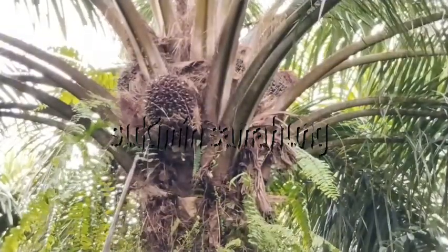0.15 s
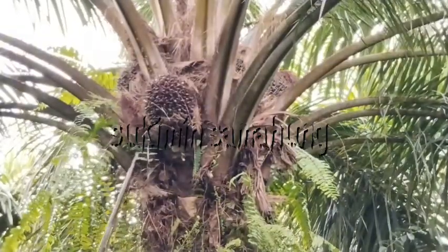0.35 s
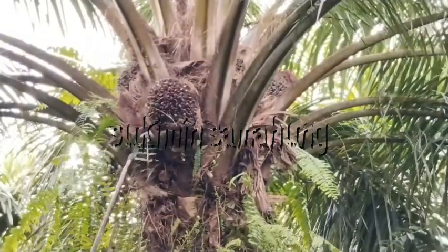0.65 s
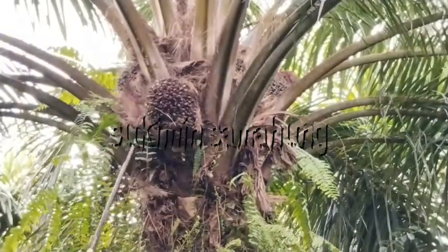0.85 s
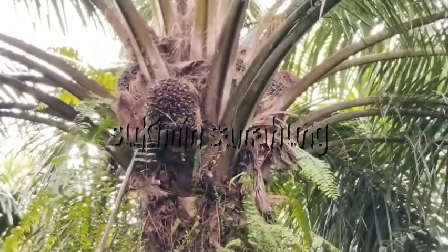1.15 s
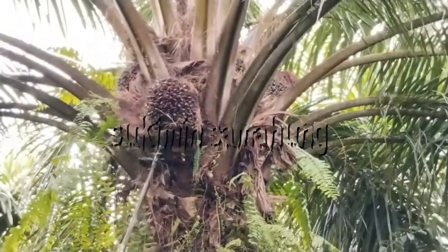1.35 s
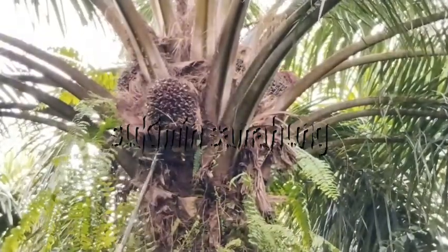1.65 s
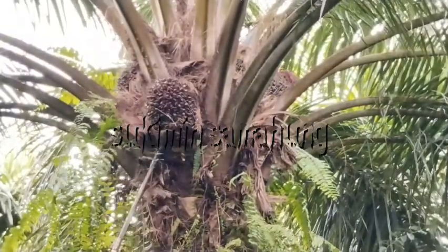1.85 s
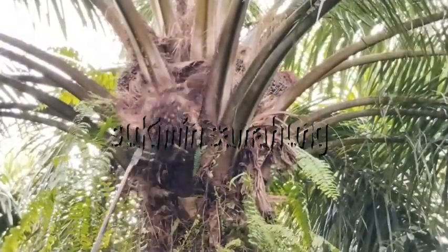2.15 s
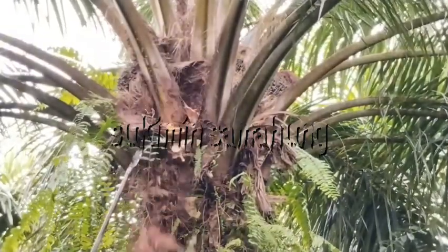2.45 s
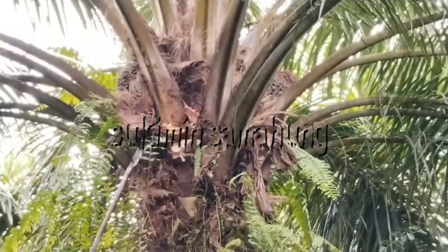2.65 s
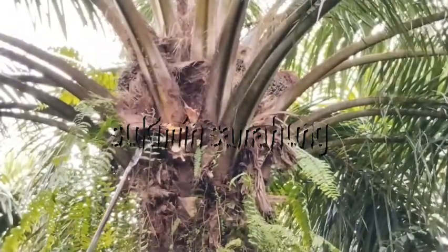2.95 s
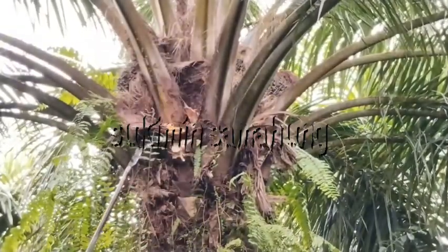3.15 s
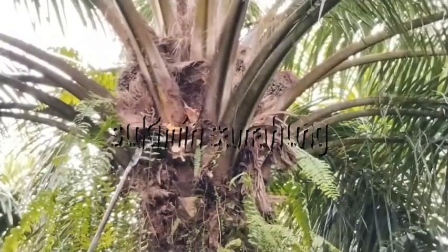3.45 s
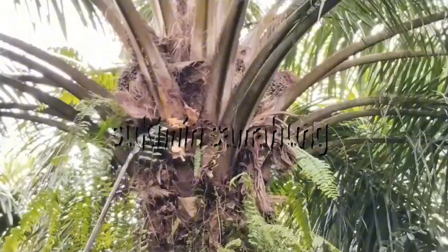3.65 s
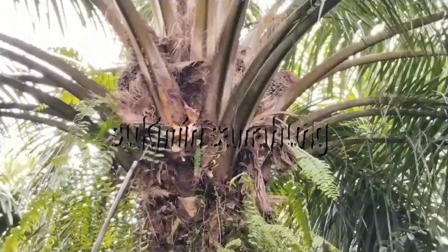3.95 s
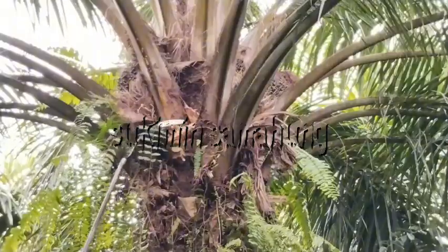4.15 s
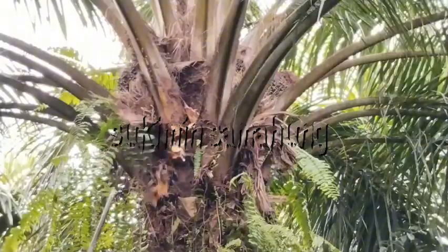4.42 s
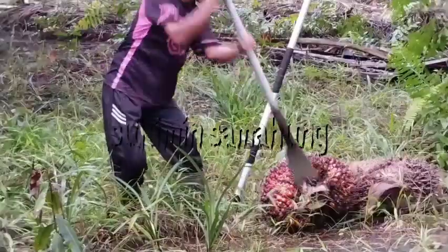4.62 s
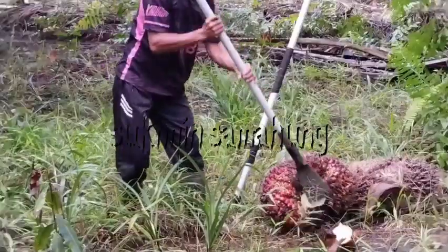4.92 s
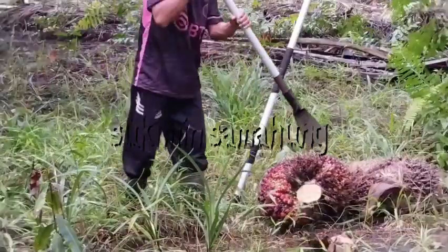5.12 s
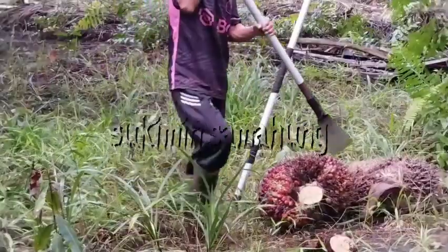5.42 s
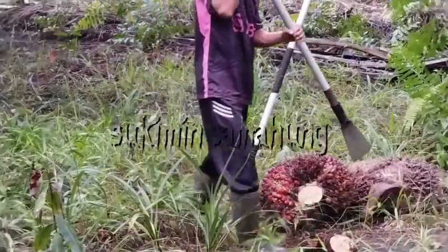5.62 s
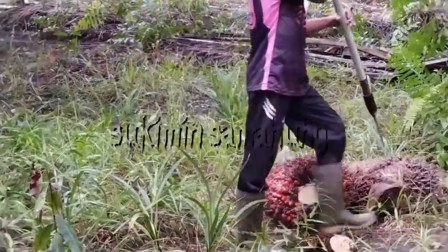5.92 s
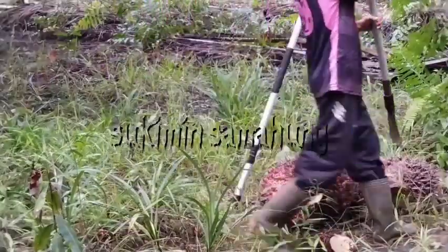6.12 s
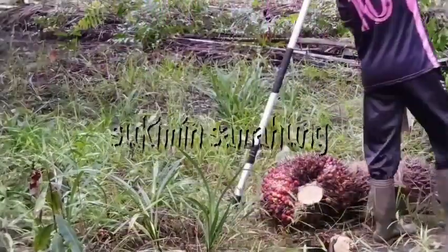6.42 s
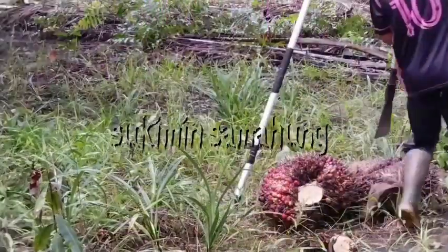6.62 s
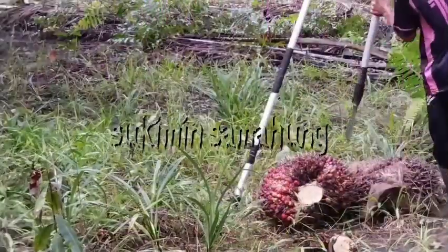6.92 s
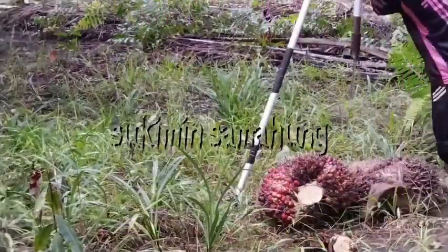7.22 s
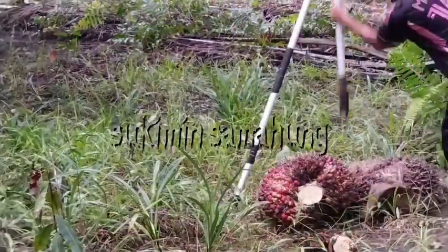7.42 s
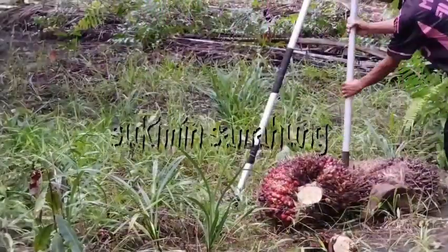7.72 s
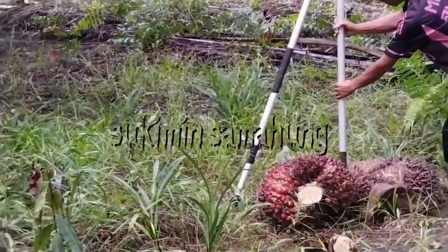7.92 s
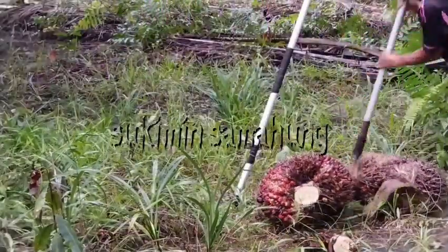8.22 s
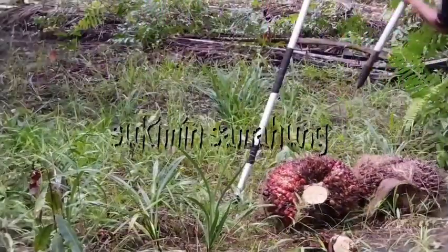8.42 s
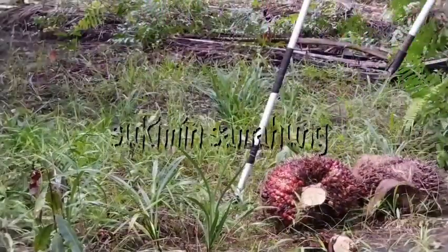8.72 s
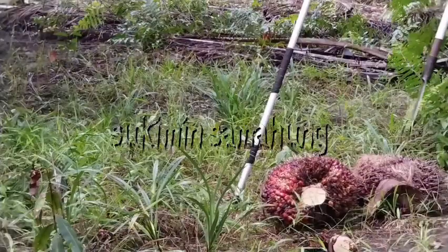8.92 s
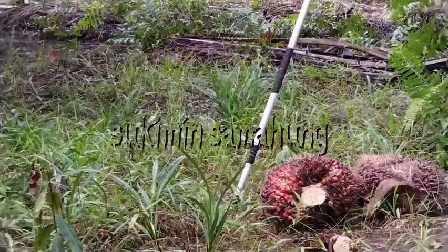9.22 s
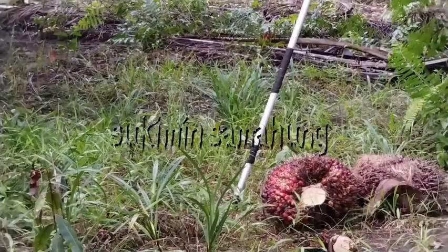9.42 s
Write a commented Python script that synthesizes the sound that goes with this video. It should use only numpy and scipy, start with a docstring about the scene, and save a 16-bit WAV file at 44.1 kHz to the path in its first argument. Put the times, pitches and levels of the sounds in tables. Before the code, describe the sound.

Insects drone high and steady in a palm plantation, with a few distant bird calls. Close by, a hooked blade saws and knocks at a stalk, fibres snap, and a bunch lands with a deep thump, followed by a crackling frond. After a tiny break, a long chisel chops twice, with boot steps in grass between the strokes, and its blade rings faintly once. The trees give a short, bright echo.

```python
"""Oil palm harvest, on one mono microphone close to the work. A pole sickle saws and knocks at a stalk
until it tears; at 3 s the bunch thuds to the ground and a frond crashes after it. After a moment of
silence at 4.5 s we are by the fallen bunches: a long chisel chops a stalk, boots tread through grass,
a second chop follows and the blade rings once. All the while insects drone around the microphone,
birds whistle further off, and the trees scatter a short, bright echo."""
import sys
import numpy as np
from scipy import signal
from scipy.fft import rfft, irfft
from scipy.io import wavfile
from scipy.ndimage import uniform_filter1d

SR = 44100
rng = np.random.default_rng(int(sys.argv[2]) if len(sys.argv) > 2 else 0)


def wav_out(sig):
    """Save sig, one row per channel (or a flat mono array), as 16-bit PCM at SR to the path in sys.argv[1]."""
    wavfile.write(sys.argv[1], SR, np.round(np.clip(np.atleast_2d(sig).T, -1, 1) * 32767).astype(np.int16))


N = 421596

# Breaking fibre at close range: woody crack, hollow body, fine fizz. Each row: frequency in Hz, gain in dB.
CRACK_COLOUR = [(300, -18.5), (800, -6), (1600, 0), (2300, -0.5), (3500, -0.5), (5000, -4.5), (7000, -6.5),
                (10000, -22.5), (15000, -31.5)]
BODY_COLOUR = [(90, -21.5), (190, -8.5), (290, -3.5), (420, -2), (600, -5), (900, -10), (1500, -13),
               (3000, -33.5)]
FIZZ_COLOUR = [(2000, -24), (4000, -6), (6000, -4.5), (8500, 0.5), (10500, -1.5), (12000, -6.5),
               (15500, -8)]
# Stalk, pole and sickle resounding at the cut. Each row: frequency in Hz, width in Hz, gain in dB.
STALK_RESONANCES = [(247, 40, 8.5), (365, 55, 4), (584, 33, 0.5), (824, 100, 8.5), (1160, 220, 12)]
SICKLE_RESONANCES = [(1470, 250, 7.2), (1892, 100, 2.8), (2500, 55, 2.6), (2960, 200, -1), (4200, 120, 6),
                     (4580, 110, 4.1)]
# Pulls of the sickle, up in the near palm. Each row: start and length in seconds, drive in dB,
# then the drive of body and of fizz in dB relative to it.
SICKLE_PULLS = [(.006, 0.045, -43, 0.5, -2), (.092, 0.01, -47, 3, -1.5), (0.193, 0.029, -45.5, 3, -.5),
                (.281, 0.0034, -50.5, -6, 7), (.56, 0.081, -39, 2, -2), (.678, 0.013, -42.5, 0, 5.5),
                (.737, 0.014, -45, -3.5, -0.5), (1.07, 0.017, -58.5, -12, 0.5), (1.25, 0.068, -48.5, -5, 0),
                (1.489, 0.052, -60, 0.5, 1), (2.132, 0.055, -40, 3, 0), (2.18, 0.036, -30.5, -7.5, -1)]


def sawing(t60=0.11, steel_db=-3, wood_db=-6):
    """Each pull of the sickle makes the woody stalk and the steel hook resound."""
    pulls = [stroke(s, length, t60, *levels) for s, length, *levels in SICKLE_PULLS]
    crack, body, fizz = fibres(pulls, spread_db=3.0, spurt_db=1.5, scatter_db=-3.5)
    steel = resonate(colour(crack, CRACK_COLOUR), SICKLE_RESONANCES) * undb(steel_db)
    wood = resonate(colour(body, BODY_COLOUR), STALK_RESONANCES) * undb(wood_db)
    return steel + wood + colour(fizz, FIZZ_COLOUR)


# Modes of a woody frond base. Each row: frequency in Hz, gain in dB, t60 in seconds.
FROND_MODES = [(262, -1.5, .045), (358, -0.5, 0.042), (426, 1.5, 0.07), (583, -10.5, .03), (840, -4, 0.027),
               (1017, -3.5, 0.026), (1176, -8, 0.044), (2024, -4.5, 0.1), (2805, -24.5, 0.066)]
# Knocks in the near palm. Each row: start in seconds, peak in dB, lowest and highest excited pitch in Hz.
SICKLE_KNOCKS = [(.099, -39, 150, 450), (0.633, -25.5, 151.4, 407), (0.736, -27, 520, 895),
                 (0.954, -47, 353, 606), (1.031, -18.5, 170, 1500), (1.464, -28.5, 151, 855),
                 (2.208, -23.5, 557, 1100)]


def knocks(rebound_s=0.003648, rebound=0.79, grit_db=-14):
    """The sickle meets a frond base and rebounds once; the contact decides which modes answer."""
    out, t = np.zeros(N), clock(.15)
    for s, db, low_hz, high_hz in SICKLE_KNOCKS:
        wood = ring(FROND_MODES, t) + rebound * ring(FROND_MODES, np.maximum(t - rebound_s, 0))
        grit = undb(grit_db) * rng.standard_normal(len(t)) * fade(t, 0.048)
        add(out, s, at_peak(bandpass(wood + grit, low_hz, high_hz, order=3), db))
    return out


def tearing():
    """Wet stalks and leaves give way with little ring."""
    strokes = crashes() + litter() + chops() + swishes() + graze()
    crack, body, fizz = fibres(strokes, spread_db=2.0, spurt_db=2.0, scatter_db=-17.5)
    return colour(crack, CRACK_COLOUR) + colour(body, BODY_COLOUR) + colour(fizz, FIZZ_COLOUR)


# Fronds tearing down through the crown. Each row: start in seconds, length in seconds, level in dB.
FROND_CRASHES = [(2.679, 0.052, -49), (2.791, 0.033, -50), (3.006, .008, -47.5), (3.047, 0.033, -53.5),
                 (3.367, 0.055, -39.5), (3.436, .05, -38), (3.517, .019, -39), (3.961, 0.0095, -56)]


def crashes(t60_per_length=6.7, light_db=-50.5):
    """Strokes of falling fronds: long ones die slowly, light ones are leaf fizz, heavy ones woodier."""
    strokes = []
    for s, length, db in FROND_CRASHES:
        weight_db = db - light_db
        body_db, fizz_db = -8 + 0.38 * weight_db, 14 - 0.69 * weight_db
        strokes.append(stroke(s, length, t60_per_length * length, db, body_db, fizz_db))
    return strokes


# Single fibres snapping near the microphone, loud or faint. Each row: start in seconds, peak in dB.
FIBRE_SNAPS = [(.282, -31), (.574, -25.5), (.68, -27), (1.156, -40), (1.277, -45), (1.303, -38),
               (2.205, -12.5), (2.686, -28), (2.724, -20.5), (3.367, -20.5), (3.463, -12.5), (3.547, -25),
               (3.966, -27.5), (7.029, -40), (7.638, -30.5)]


def snaps(t60=0.0074, crack_db=-11):
    """A stiff fibre breaks with a sharp, bright tick; more snap at random inside every crash."""
    out, t = np.zeros(N), clock(.02)
    for s, db in FIBRE_SNAPS + sprinkle(FROND_CRASHES, per_s=45, over_db=17.5, spread_db=2):
        split = rng.standard_normal((2, len(t))) * fade(t, t60)
        tick = colour(split[0], FIZZ_COLOUR) + undb(crack_db) * colour(split[1], CRACK_COLOUR)
        add(out, s, at_peak(tick, db))
    return out


# Bunch, then frond, landing close by. Each row: start in seconds, level in dB.
LANDINGS = [(3.02, -11.5), (3.39, -28.5)]
# The soft ground under them. Each row: frequency in Hz, gain in dB, t60 in seconds.
GROUND_MODES = [(286, -1, 0.017), (54.4, -.5, 0.18), (125.7, -12.5, 0.12), (175, -16.5, .06),
                (95.1, -22.5, 0.49)]


def landings():
    """Blows that shake the ground as bunch and frond come down."""
    return [(s, db + mode_db, hz, t60) for s, db in LANDINGS for hz, mode_db, t60 in GROUND_MODES]


def litter(rise_s=.0013, hold_s=.004, t60=0.093, crush_db=-21, body_db=2.5, fizz_db=-2.0):
    """Each landing crushes the dry litter beneath it in one stroke."""
    return [(s, rise_s, hold_s, t60, db + crush_db, body_db, fizz_db) for s, db in LANDINGS]


# The chisel, close by at ground level. Each row: start in seconds, level in dB, t60 in seconds, body and
# fizz in relative dB, time to cut through in seconds, closing knock in dB, swing of the bunch in dB.
CHISEL_CHOPS = [(4.82, -25, .07, -12, -4.5, .048, -13.5, -21.5),
                (7.634, -38.5, 0.16, -5.5, -0.5, .033, -43, -33.5)]


def chops(rise_s=0.0026, hold_s=0.019):
    """Strokes of the chisel through the stalk of a fallen bunch."""
    return [(s, rise_s, hold_s, t60, db, body_db, fizz_db)
            for s, db, t60, body_db, fizz_db, *_ in CHISEL_CHOPS]


# A fallen bunch swinging. Each row: frequency in Hz, gain in dB, t60 in seconds.
BUNCH_MODES = [(118, -0.5, .11), (180, -1, .06)]


def jolts(knock_hz=268, knock_t60=.022):
    """Blows that end each chop: the chisel knocks through and jolts the bunch."""
    knock = [(s + cut_s, db, knock_hz, knock_t60) for s, *_, cut_s, db, _ in CHISEL_CHOPS]
    swing = [(s + cut_s, db + mode_db, hz, t60)
             for s, *_, cut_s, _, db in CHISEL_CHOPS for hz, mode_db, t60 in BUNCH_MODES]
    return knock + swing


# Hollow rubber boots nearby. Each row: start in seconds, level in dB, pitch in Hz, t60 in seconds.
BOOT_CLOPS = [(5.497, -20, 504, 0.012), (5.572, -29.5, 314, 0.032), (5.599, -33.5, 333, .06),
              (5.636, -28, 600, 0.027), (5.647, -35.5, 575, 0.063), (5.738, -39.5, 733, .043),
              (8.672, -36, 440, 0.026)]


def thuds(soil_db=-13):
    """Each blow on ground, bunch or boot is a heavy, damped swing, roughened by crumbling soil."""
    out = np.zeros(N)
    for s, db, hz, t60 in landings() + jolts() + BOOT_CLOPS:
        t = clock(2 * t60)
        soil = unit(bandpass(rng.standard_normal(len(t)), hz / 2, hz * 2))
        swing = np.sin(2 * np.pi * hz * t) + undb(soil_db) * soil
        contact = 1 - np.exp(-4 * hz * t)
        add(out, s, undb(db) * contact * fade(t, t60) * swing)
    return out


# The steel of the chisel. Each row: frequency in Hz, gain in dB, t60 in seconds.
BLADE_MODES = [(1250, 4.5, 0.072), (1540, 7, 0.059), (1765, 3.5, 0.25), (1810, 4, .17), (2475, -10, .23),
               (3496, -2.5, 0.25), (3820, 2, .07), (5330, -12, .25), (8086, 3.5, 0.19), (9830, 1, .13),
               (10950, -5, .15)]
BLADE_S, BLADE_DB = 8.449, -47


def blade(contact_s=0.015):
    """The chisel grazes something hard; the chatter of the contact rings the steel."""
    out, t, tail = np.zeros(N), clock(contact_s), clock(.5)
    chatter = rng.standard_normal(len(t)) * signal.windows.hann(len(t))
    for hz, db, t60 in BLADE_MODES:
        clank = signal.fftconvolve(chatter, ring([(hz, 0, t60)], tail))
        add(out, BLADE_S, at_peak(clank, BLADE_DB + db))
    return out


def graze(lead_s=0.0089, hold_s=.006, t60=0.24, rub_db=-5, body_db=-17.0, fizz_db=-2):
    """The chisel rubs for an instant before it rings."""
    return [(BLADE_S - lead_s, lead_s, hold_s, t60, BLADE_DB + rub_db, body_db, fizz_db)]


# Grass by the microphone. Each row: start and length in seconds, level in dB, body and fizz in relative dB.
GRASS_SWISHES = [(5.383, .1, -55, 0, -0.5), (5.498, 0.025, -49, -9, 4), (5.554, 0.16, -55.5, 3, 1.5),
                 (6.22, .11, -71.5, -1.5, 14.5), (6.599, 0.032, -74, 0, -2.5),
                 (6.721, 0.035, -74.5, 2.5, 0), (6.991, 0.011, -69.5, -4, 0.5),
                 (7.024, 0.0058, -69.5, -9, 6.5), (7.959, 0.058, -80.5, -8.5, 16.5),
                 (8.269, 0.054, -67, -1.5, -2), (8.595, .038, -66, -9, 11)]


def swishes(t60=0.2):
    """Strokes of boots and tool brushing through grass."""
    return [stroke(s, length, t60, *levels) for s, length, *levels in GRASS_SWISHES]


# Short, hollow contacts close by, including the bite of a sickle knock and the body of a chop.
# Each row: start in seconds, peak in dB, pitch in Hz.
HOLLOW_BUMPS = [(1.031, -35.5, 2950), (1.156, -46, 2200), (1.275, -39.5, 1390), (2.158, -29.5, 1200),
                (3.91, -44, 1060), (4.308, -44, 1650), (4.312, -52.5, 468), (5.149, -61.5, 1700),
                (5.355, -58.5, 527), (5.395, -58, 1450), (5.625, -46, 830), (5.76, -53, 516),
                (6.248, -57, 427), (7.643, -31.5, 950), (8.314, -58, 727)]


def bumps(t60=0.055, rise_s=0.002, edge_ratio=1.19, nudge_hz=540, nudge_octaves=0.2):
    """Hollow contacts: a short rub through one broad resonance, with random nudges in every swish."""
    out, t = np.zeros(N), clock(.12)
    nudges = [(s, db, nudge_hz * 2 ** (nudge_octaves * rng.standard_normal()))
              for s, db in sprinkle(GRASS_SWISHES, per_s=33, over_db=1, spread_db=3.0)]
    for s, db, hz in HOLLOW_BUMPS + nudges:
        rub = rng.standard_normal(len(t)) * np.minimum(t / rise_s, 1) * fade(t, t60)
        add(out, s, at_peak(bandpass(rub, hz / edge_ratio, hz * edge_ratio), db))
    return out


# A songbird off among the trees. Each row: start in seconds, loudest note in dB, first pitch in Hz.
BIRD_SONGS = [(3.665, -48.5, 2960), (5.8, -63.5, 2900)]
CLEAR, SLURRED, HOARSE = .14, 0.29, .66  # flutter of the pitch, 0-1


def song_notes(count=5, note_s=0.056, gap_s=.135, quicken=.76, fall_hz=425, swell_db=2.5):
    """Each note comes sooner and lower than the one before; the last but one is the loudest."""
    notes = []
    for s, db, first_hz in BIRD_SONGS:
        for k in range(count):
            hz = first_hz - fall_hz * (k / (count - 1)) ** 2
            notes.append((s, note_s, hz, hz, db - swell_db * abs(count - 2 - k), CLEAR))
            s += gap_s * quicken ** k
    return notes


# Short rising chirps from the trees. Each row: start in seconds, first pitch in Hz, level in dB.
BIRD_CHIRPS = [(1.695, 3100, -56.5), (3.181, 3200, -57), (3.863, 2950, -42.5), (5.907, 1950, -74.5),
               (6.111, 1950, -69), (6.164, 1950, -69)]
# Faint, longer upward sweeps. Each row: start in seconds, level in dB.
BIRD_SWEEPS = [(5.08, -78), (5.322, -69.5)]
# Down-slurred whistles, then hoarse calls. Each row: start and length in seconds, pitch in Hz, level in dB.
BIRD_WHISTLES = [(.268, 0.4, 4480, -65.5), (1.944, 0.17, 4460, -59.5), (2.912, 0.056, 3930, -53.5),
                 (3.223, .057, 4140, -58), (3.283, .051, 4550, -52.5), (7.112, .083, 4590, -60.5),
                 (7.219, .11, 3700, -59.5)]
BIRD_RASPS = [(1.767, .079, 3270, -64), (5.14, 0.068, 3790, -66), (7.311, 0.12, 3095, -53),
              (7.32, 0.092, 4420, -58), (7.4, 0.094, 3150, -58)]


def birds(rasp_hz=380, waver_db=3.0):
    """Gliding whistles waver on their way through the leaves; a fast pitch flutter makes some hoarse."""
    chirps = [(s, .037, hz, hz * 1.15, db, CLEAR) for s, hz, db in BIRD_CHIRPS]
    sweeps = [(s, .1, 1900, 4100, db, SLURRED) for s, db in BIRD_SWEEPS]
    whistles = [(s, length, hz, hz * .915, db, SLURRED) for s, length, hz, db in BIRD_WHISTLES]
    rasps = [(s, length, hz, hz, db, HOARSE) for s, length, hz, db in BIRD_RASPS]
    out = np.zeros(N)
    for s, length, start_hz, end_hz, db, rasp in song_notes() + chirps + sweeps + whistles + rasps:
        t = clock(length)
        glide = start_hz * (end_hz / start_hz) ** (t / length)
        hz = glide + rasp * rasp_hz * walk(1100, len(t))
        swell = undb(db + waver_db * (walk(106, len(t)) - .5)) * signal.windows.tukey(len(t), .5)
        add(out, s, swell * np.sqrt(2) * np.sin(2 * np.pi * np.cumsum(hz) / SR))
    return out


# The insect chorus all round the microphone. Each row: frequency in Hz, gain in dB.
INSECT_COLOUR = [(3800, -44), (4650, -23), (5050, -10), (5450, -1.5), (5950, -9.5), (6400, -1), (7100, 2),
                 (7550, -3.5), (8100, -12), (9600, -10), (10400, -4.5), (11400, -38), (13500, -15.5),
                 (15200, -21)]
# It swells under the palm and is fainter by the fallen bunches. Each row: time in seconds, level in dB.
INSECT_LEVELS = [(0, -54.5), (1, -56.5), (2, -56), (3.7, -48), (4.5, -47.5), (4.58, -57), (5, -59),
                 (6.8, -60.5), (8.1, -57.8), (9, -59)]


def insects(flutter_db=1.0, swell_db=2.0):
    """Countless overlapping insect clicks merge into a few shrill, fluttering bands."""
    chorus = colour(grains(N, rate=20000, spread_db=1.5), INSECT_COLOUR)
    return chorus * undb(flutter_db * walk(70, N) + swell_db * walk(6.3, N)) * curve(INSECT_LEVELS)


# Leaves rustling overhead. Each row: frequency in Hz, gain in dB.
LEAF_COLOUR = [(200, -0.5), (500, -4), (1200, -8.5), (2200, -2.5), (3200, 2.5), (4500, -2), (9000, -4),
               (12000, -13), (15500, -5)]
# Their background stir in the breeze. Each row: time in seconds, level in dB.
BREEZE_LEVELS = [(0, -60.5), (2.1, -63.5), (4.5, -58), (4.58, -79), (8.7, -76.5), (9.1, -89.5)]
# Shakes of the near crown. Each row: time of the peak in seconds, level in dB.
CROWN_SHAKES = [(0, -54.5), (2.3, -57), (2.68, -54.5), (3.15, -52), (3.5, -39.5), (4.28, -61)]


def foliage(flicker_db=2.5, rise_s=0.13, settle_t60=1.8):
    """Leaflets brush each other in the breeze and at every shake, most while the fallen frond settles."""
    t = np.arange(N) / SR
    shakes = [undb(db) * np.clip(1 + (t - s) / rise_s, 0, 1) * fade(t - s, settle_t60)
              for s, db in CROWN_SHAKES]
    motion = np.linalg.norm([curve(BREEZE_LEVELS)] + shakes, axis=0)
    contacts = grains(N, rate=7000, spread_db=3.0) * undb(flicker_db * walk(35, N))
    return colour(contacts, LEAF_COLOUR) * motion


# Open air in the plantation. Each row: frequency in Hz, gain in dB.
RUMBLE_COLOUR = [(18, -5.5), (32, 1.5), (55, -2.5), (90, -9), (150, -16.5), (300, -28.5), (600, -36),
                 (1500, -46), (4000, -52.5), (9000, -61)]


def air(level_db=-60, gust_db=1.5):
    """Low outdoor rumble, wavering a little."""
    rumble = colour(rng.standard_normal(N), RUMBLE_COLOUR, size=8192)
    return rumble * undb(level_db + gust_db * walk(12, N))


# What the surrounding trees send back to the microphone. Each row: frequency in Hz, gain in dB.
ECHO_COLOUR = [(100, -23.5), (600, -19.5), (1500, -8), (3000, 2.5), (6000, 1.5), (10000, 3.5), (15000, -5)]


def trees(x, t60=0.34, build_s=0.014, paths=5):
    """Trunks and fronds scatter a bright echo; moving leaves shift its paths, so it does not ring."""
    echo, t = np.zeros(N), clock(1)
    for _ in range(paths):
        tail = colour(rng.standard_normal(len(t)), ECHO_COLOUR) * (1 - np.exp(-t / build_s)) * fade(t, t60)
        path = signal.fftconvolve(x, tail / np.linalg.norm(tail))[:N]
        echo += path * np.cos(np.pi * walk(25, N))
    return echo * np.sqrt(2 / paths)


def fibres(strokes, spread_db, spurt_db, scatter_db, scatter_t60=.025):
    """Fibres part in uneven spurts; returns the drive of the crack, the hollow body and the fine fizz."""
    crack, body, fizz = np.zeros((3, N))
    lag = clock(.03)
    for s, rise, hold, t60, db, body_db, fizz_db in strokes:
        t = clock(rise + hold + t60)
        fractures = grains(len(t), rate=12000, spread_db=spread_db)
        spurts = unit(fractures * undb(spurt_db * walk(300, len(t))))
        burst = spurts * np.minimum(t / rise, 1) * fade(t - rise - hold, t60) * undb(db)
        # each spot on the plant has its own fine resonances, so no two strokes share a colour
        spot = rng.standard_normal(len(lag)) * fade(lag, scatter_t60)
        rung = signal.fftconvolve(burst, spot / np.linalg.norm(spot))[:len(t)]
        woody = (burst + undb(scatter_db) * rung) / np.hypot(1, undb(scatter_db))
        add(crack, s, woody)
        add(body, s, woody * undb(body_db))
        add(fizz, s, burst * undb(fizz_db) * rng.choice([-1, 1], len(t)))
    return crack, body, fizz


def stroke(s, length, t60, db, body_db, fizz_db, swell_s=0.049):
    """Split a stroke into rise and hold: one longer than swell_s is mostly rise."""
    rise = length ** 2 / (length + swell_s)
    return s, rise, length - rise, t60, db, body_db, fizz_db


def sprinkle(events, per_s, over_db, spread_db):
    """Brief contacts at random moments of each (s, length, dB) event; gives (s, peak dB) rows."""
    return [(s + length * rng.random(), db + over_db + spread_db * rng.standard_normal())
            for s, length, db, *_ in events for _ in range(int(np.ceil(per_s * length)))]


def grains(count, rate, spread_db):
    """Random tiny clicks, many small and a few large; rms 1."""
    size = undb(spread_db * np.minimum(rng.exponential(size=count), 2 * np.pi))
    sign = rng.choice([-1, 1], count)
    return unit(size * sign * (rng.random(count) < rate / SR) + 1e-9)


def walk(rate, count):
    """Smooth random wander, spread near 1."""
    k = max(int(SR / rate), 1)
    steps = np.repeat(rng.standard_normal(count // k + 1), k)
    return np.sqrt(2) * uniform_filter1d(uniform_filter1d(steps, k), k)[:count]


def ring(modes, t):
    """Decaying modes after one blow."""
    return sum(undb(db) * np.sin(2 * np.pi * hz * t) * fade(t, t60) for hz, db, t60 in modes)


def resonate(x, peaks):
    """Lift narrow (Hz, width Hz, dB) resonances out of x."""
    return x + sum(undb(db) * signal.lfilter(*signal.iirpeak(hz, hz / width, fs=SR), x)
                   for hz, width, db in peaks)


def colour(x, points, size=2048):
    """Filter x with a causal, unit-energy response of the given (Hz, dB) colour."""
    hz, db = np.transpose(points)
    bins = np.maximum(np.arange(size // 2 + 1) * SR / size, 1)
    cepstrum = irfft(np.log(undb(np.interp(np.log(bins), np.log(hz), db))))
    cepstrum[1:size // 2] *= 2  # fold to minimum phase
    cepstrum[size // 2 + 1:] = 0
    response = irfft(np.exp(rfft(cepstrum)))
    return signal.fftconvolve(x, response / np.linalg.norm(response))[:len(x)]


def bandpass(x, low_hz, high_hz, order=2):
    """Keep one band of x."""
    return signal.sosfilt(signal.butter(order, [low_hz, high_hz], "band", fs=SR, output="sos"), x)


def undb(db):
    """Decibels to gain."""
    return 10 ** (np.asarray(db) / 20)


def unit(x):
    """Scale to rms 1."""
    return x / np.sqrt(np.mean(x ** 2))


def at_peak(x, db):
    """Scale to a peak in dB."""
    return x / np.abs(x).max() * undb(db)


def curve(rows):
    """Gain over time from (s, dB) rows."""
    return undb(np.interp(np.arange(N) / SR, *np.transpose(rows)))


def clock(length):
    """Sample times of a short sound."""
    return np.arange(int(length * SR) + 1) / SR


def fade(t, t60):
    """Exponential decay, 60 dB in t60."""
    return np.exp(-np.log(1000) * np.maximum(t, 0) / t60)


def add(track, s, sound):
    """Mix a sound into the track at time s."""
    start = max(int(s * SR), 0)
    track[start:start + len(sound)] += sound[:max(N - start, 0)]


def scene():
    """At the microphone: work close by, birds further off among the trees, insects all round."""
    work = sawing() + tearing() + snaps() + knocks() + thuds() + bumps() + blade()
    song = birds()
    echo = trees(undb(-11.5) * work + undb(-5.5) * song)
    mono = work + undb(0.6) * song + echo + insects() + foliage() + air()
    return np.array([mono, mono])


def record(dry):
    """The sound drops out for a moment between palm and fallen bunches; the top is cut steeply."""
    silent_from_s, silent_to_s, top_hz = 4.499, 4.576, 15600
    t = np.arange(N) / SR
    live = (t < silent_from_s) | (t > silent_to_s)
    return signal.sosfilt(signal.ellip(10, .2, 80, top_hz, fs=SR, output="sos"), dry * live)


dry = scene()
out = record(dry)
wav_out(out)
```